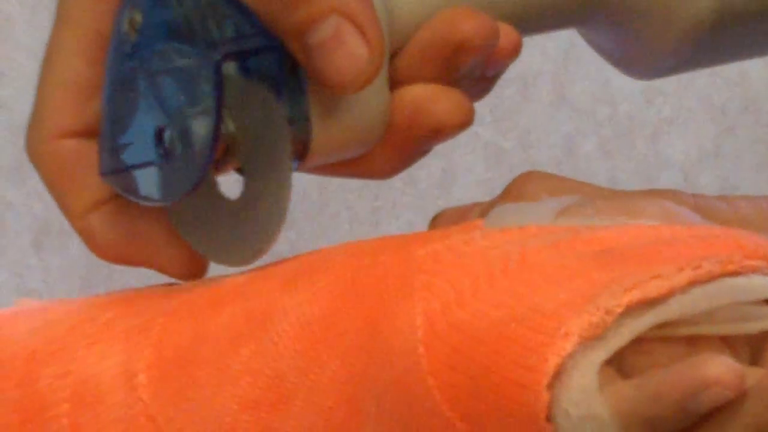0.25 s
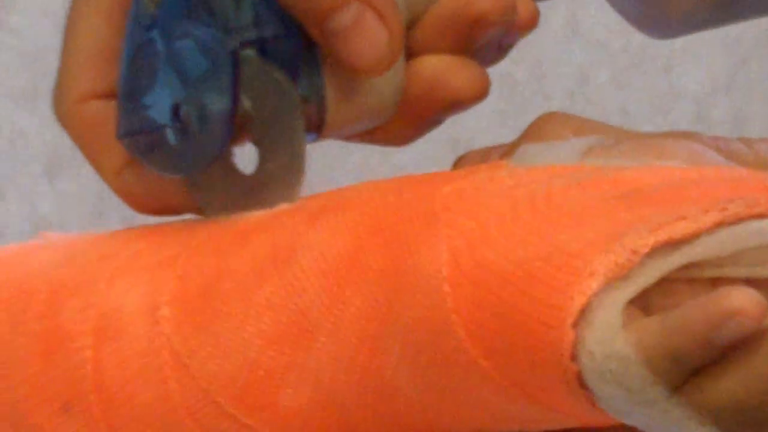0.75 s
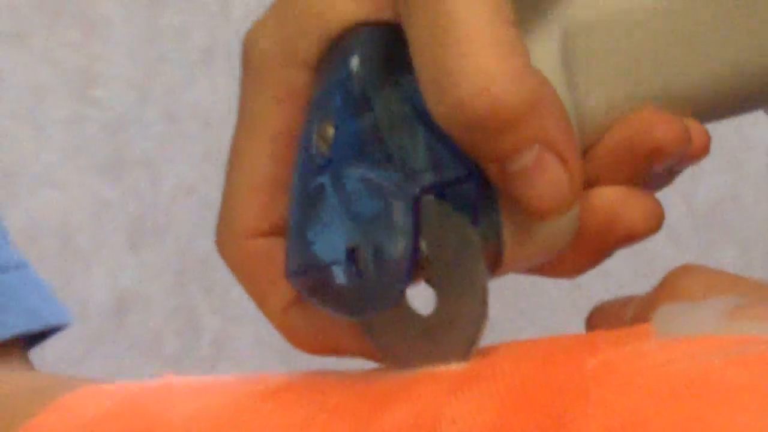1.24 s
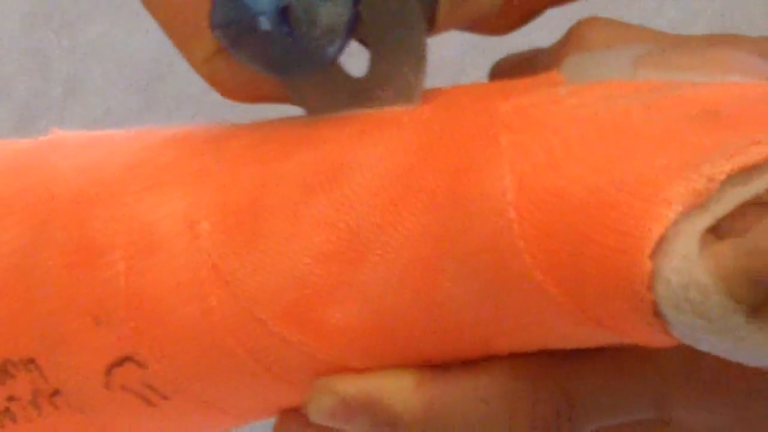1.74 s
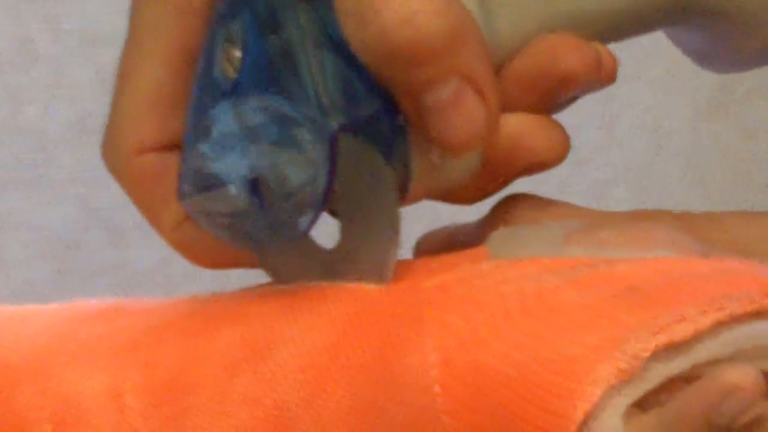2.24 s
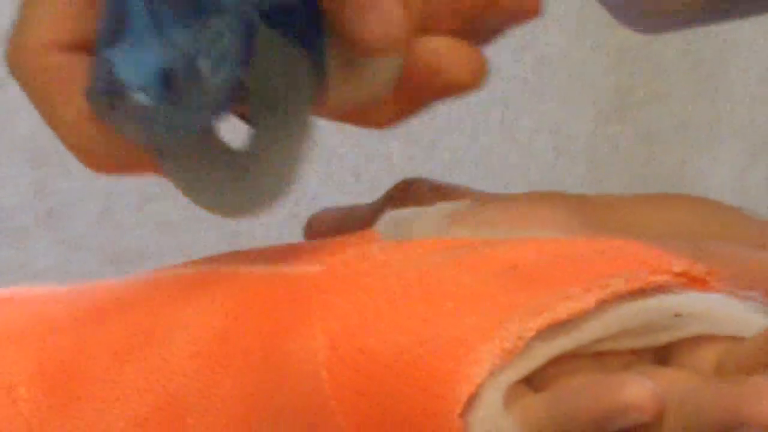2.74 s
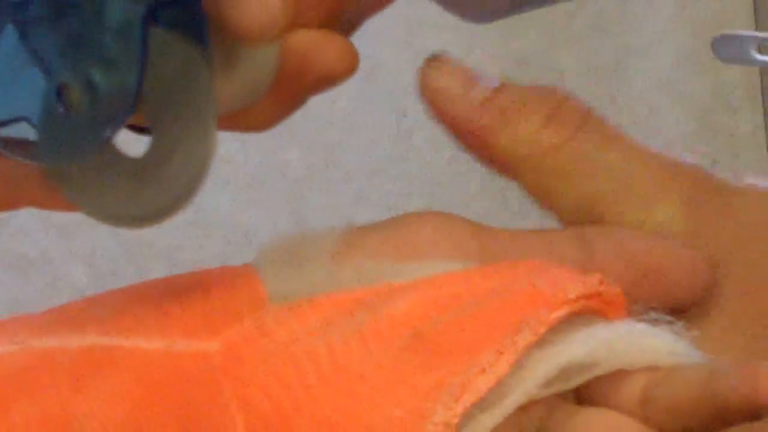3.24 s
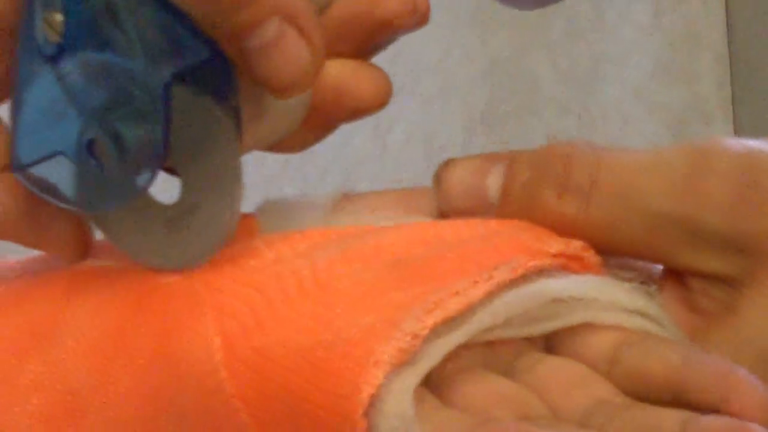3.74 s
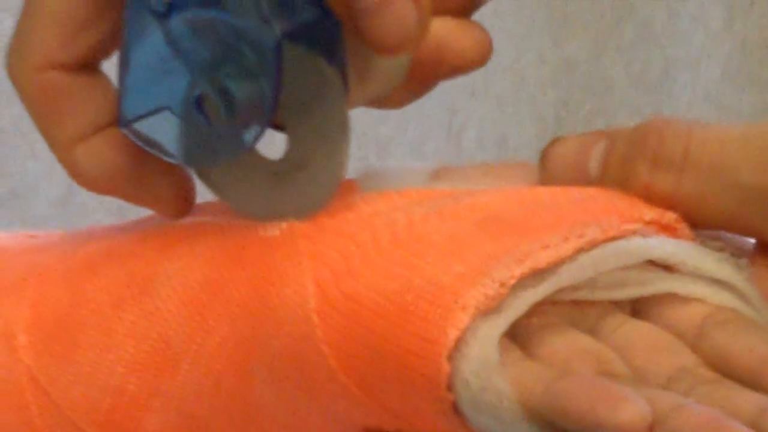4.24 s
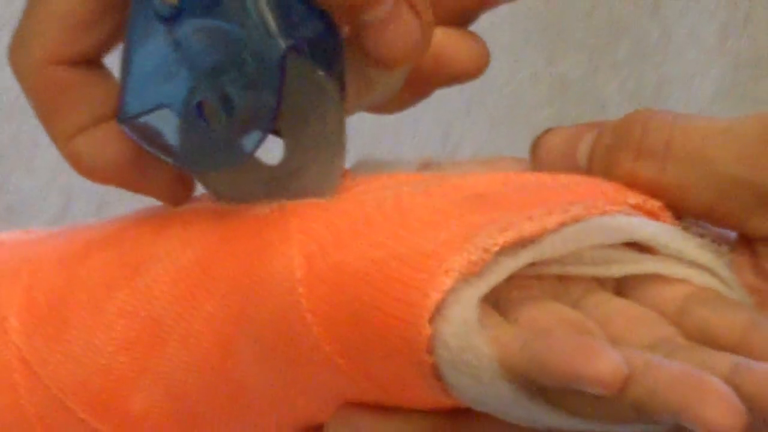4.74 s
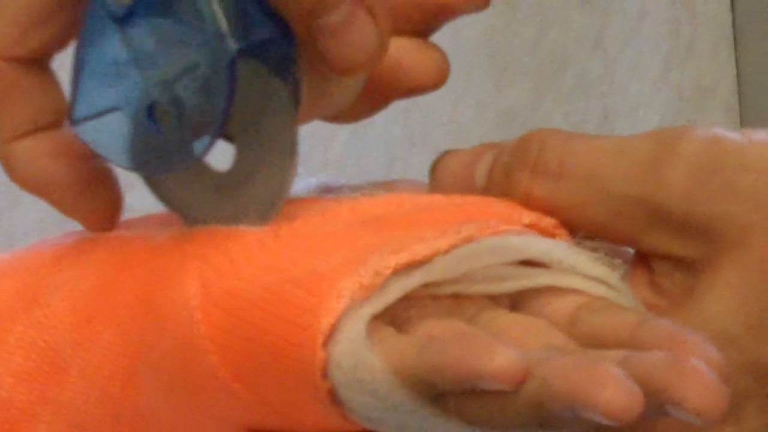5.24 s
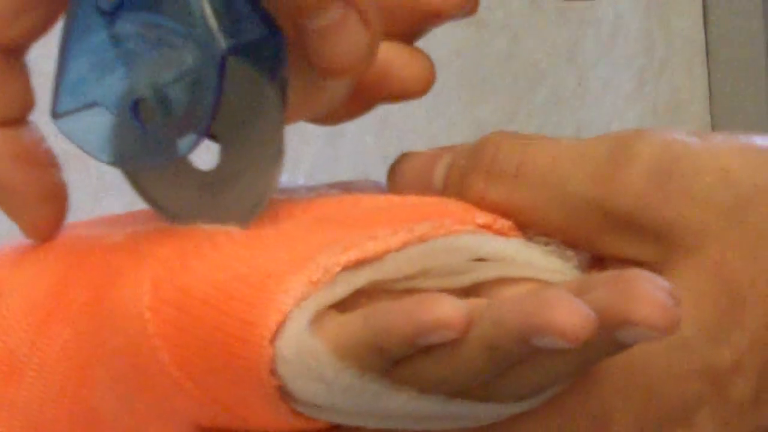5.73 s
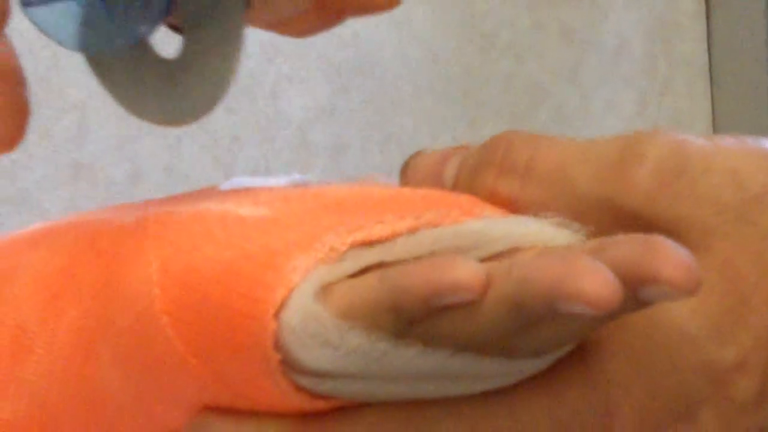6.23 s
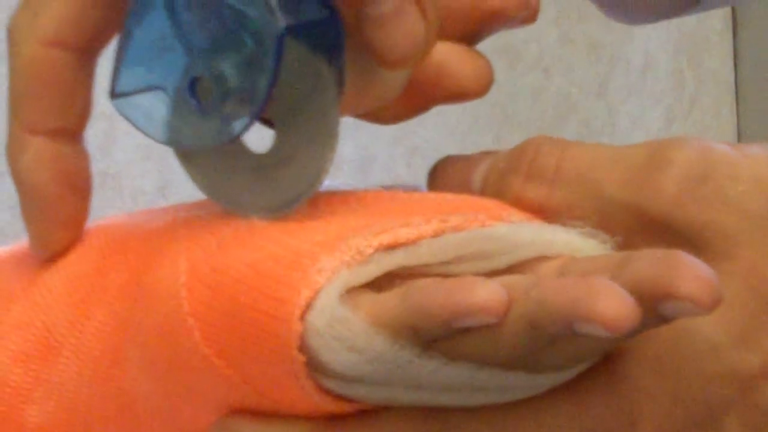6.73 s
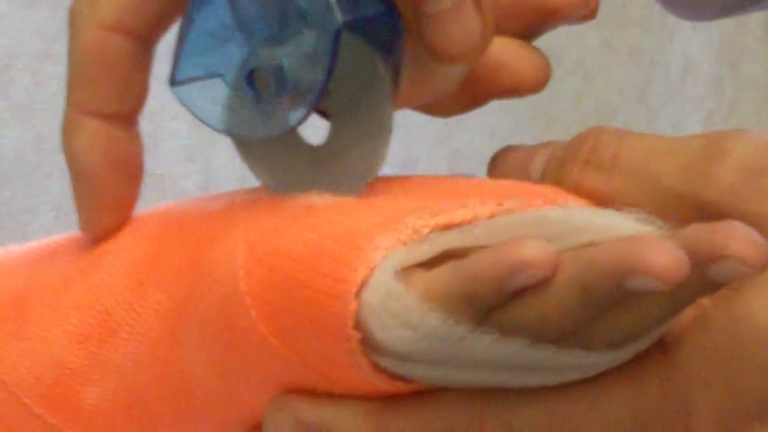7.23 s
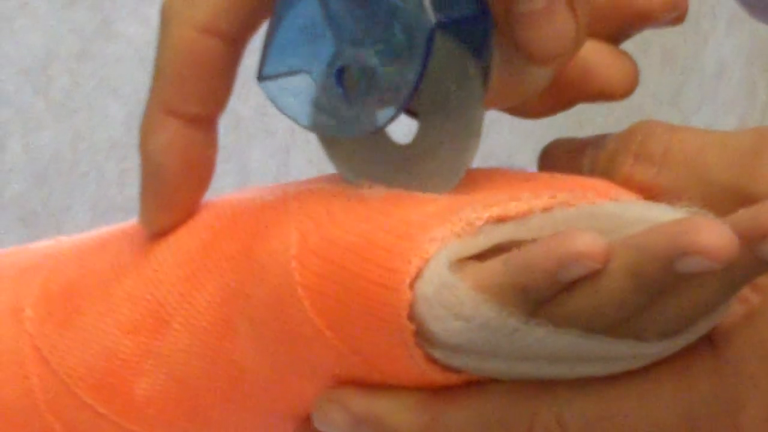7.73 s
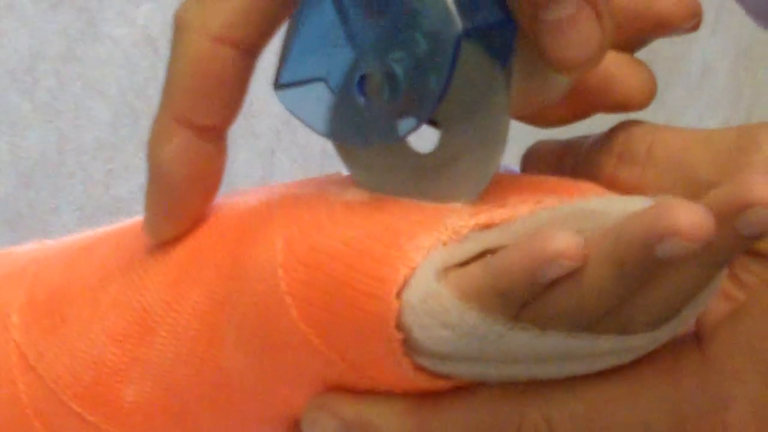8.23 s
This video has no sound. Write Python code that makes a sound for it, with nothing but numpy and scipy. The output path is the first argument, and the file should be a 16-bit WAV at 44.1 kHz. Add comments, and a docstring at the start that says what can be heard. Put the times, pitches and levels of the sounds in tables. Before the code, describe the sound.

A small electric cast saw whines close by, sagging and turning raspy three times as its blade bites into a hard fiberglass cast.

```python
"""Treatment room: a small electric cast saw runs close by, pressed three times into a fiberglass cast.
The oscillating blade whines as a stack of swing overtones; the drive adds high overtones and pulsed hiss.
Random clicks scrape throughout; in each cut the motor sags, the whine roughens and the teeth rasp.
Snags ring the shell. A second motor hums steadily over coloured air noise and faint rumble."""
import sys
import numpy as np
from scipy import signal
from scipy.fft import rfft, irfft, next_fast_len
from scipy.io import wavfile
from scipy.ndimage import uniform_filter1d

SR = 44100
rng = np.random.default_rng(int(sys.argv[2]) if len(sys.argv) > 2 else 0)


def persist_wave(psi):
    """Save psi, clipped to +-1, as 16-bit WAV."""
    counts = np.round(np.clip(psi, -1, 1) * 32767).astype(np.int16)
    wavfile.write(sys.argv[1], SR, np.atleast_2d(counts).T)


N = 373729


def from_db(db):
    """Decibels to gain."""
    return 10 ** (np.asarray(db) / 20)


def rms_one(x):
    """Scale to unit rms."""
    return x / np.sqrt(np.mean(x ** 2) + 1e-20)


def in_time(rows):
    """Each column of a time curve, at every sample."""
    time_s, *columns = np.transpose(rows)
    return [np.interp(np.arange(N) / SR, time_s, column) for column in columns]


def at_hz(points, hz):
    """Each column of a spectrum, read on a log-frequency axis."""
    grid_hz, *columns = np.transpose(points)
    return [np.interp(np.log(hz + 1), np.log(grid_hz), column) for column in columns]


def drift(rate_hz):
    """Slow noise, rms near 1: two-pole lowpass on every 40th sample, then interpolated."""
    pole = np.exp(-80 * np.pi * rate_hz / SR)
    noise = rng.standard_normal(N // 40 + 2002)
    slow = signal.lfilter([1], [1, -2 * pole, pole * pole], noise)[2000:]  # drop the warm-up
    return np.interp(np.arange(N) / 40, np.arange(len(slow)), rms_one(slow))


def colour(x, spectrum):
    """Give x a smooth spectrum; rms 1."""
    size = next_fast_len(N)
    level_db, = at_hz(spectrum, np.arange(size // 2 + 1) * SR / size)
    return rms_one(irfft(rfft(x, size) * from_db(level_db), size)[:N])


def swells(rows):
    """Half-cosine rise and fall in dB for each row of (middle_s, length_s, change_db)."""
    t, out = np.arange(N) / SR, np.zeros(N)
    for middle_s, length_s, change_db in rows:
        near = np.abs(t - middle_s) < length_s / 2
        out[near] += change_db * np.cos(np.pi * (t[near] - middle_s) / length_s)
    return out


# press of the blade into the cast: start_s, end_s, extra_scrape_db
PRESSES = [(.55, 2.87, 2), (4.42, 6.21, 2.7), (7.32, 8.7, 0.5)]
SINK_S, LIFT_S = 0.14, 0.14


def contact():
    """Blade hold in the cast, 0 (air) to 1 (cut), and the extra scrape of each cut in dB."""
    t, load, scrape_db = np.arange(N) / SR, 0, 0
    for start_s, end_s, extra_db in PRESSES:
        held = np.clip(np.minimum((t - start_s) / SINK_S, (end_s - t) / LIFT_S), 0, 1)
        load = load + held
        scrape_db = scrape_db + extra_db * held
    return load, scrape_db


# one overtone swelling for a moment, in the air or in the cut: middle_s, length_s, order, rise_db
SQUEALS = [(0.616, .12, 6, 6.5), (1.38, 0.15, 6, 12), (1.387, 0.14, 9, 9.5), (1.45, 1, 10, 7),
           (1.548, 0.13, 8, 8), (1.685, 0.15, 6, 7), (1.69, 0.18, 7, 8.5), (2.1, 0.78, 9, 6),
           (2.173, 0.38, 8, 5.5), (2.96, 0.6, 9, 5.5), (3.14, 0.31, 7, 4), (3.25, 0.8, 13, 6),
           (3.45, .4, 11, 5.5), (3.66, 1.1, 9, 4), (3.645, .9, 10, 2.5), (3.7, 0.99, 3, 4),
           (4.63, 0.22, 6, 6), (4.894, 0.15, 6, 7), (5.205, 0.14, 6, 8), (5.672, 0.16, 6, 4.5),
           (5.8, 1.1, 12, 6.5), (6.006, 0.27, 6, 5), (6.45, .3, 7, 3), (6.743, .2, 11, 5),
           (7.138, 0.36, 11, 8), (8.03, 1.3, 6, 5), (8.1, 0.18, 8, 0)]


def squeal(order):
    """Rise in dB of one overtone while it swells."""
    return swells([(middle_s, length_s, rise_db) for middle_s, length_s, swelling, rise_db in SQUEALS
                   if round(swelling) == order])


WHINE_DIP_DELAY_S, WHINE_DIP_S, WHINE_DIP_DB = 0.17, 0.12, -6


def whine_dip():
    """The swell of the whine dips shortly after each press starts and around its end, in dB."""
    moments_s = [s for start_s, end_s, _ in PRESSES for s in (start_s + WHINE_DIP_DELAY_S, end_s)]
    return swells([(s, WHINE_DIP_S, WHINE_DIP_DB) for s in moments_s])


def overtone(order, phase, load, waver_db, free_rough, cut_rough):
    """One multiple of the swing, rms near 1; roughness smears it into a band, as teeth catch in the cut."""
    rough = free_rough + (cut_rough - free_rough) * load
    angle = order * phase + rng.uniform(0, 2 * np.pi) + rough * drift(14.0)
    flicker = from_db(waver_db * drift(7.0)) * (1 + rough * drift(17.3)) / np.sqrt(1 + rough ** 2)
    return np.sqrt(2) * np.sin(angle) * flicker


# swell of the whine, before shares: time_s, swell_db
WHINE_SWELL = [(0, 9.5), (.16, 9.5), (.64, 8.5), (.73, -2), (1.4, 0), (1.9, -7), (2.25, -12), (2.5, -6.5),
               (2.8, -3), (3.05, 3.5), (3.4, 3.5), (3.9, -3.5), (4.46, 5.5), (4.57, -1), (5.3, 2.5),
               (7.35, 0), (7.58, -6.5), (8.1, -0.5)]
# leading overtones, before swell, squeal and trim: order, free_db, cut_db, swell_share
WHINE = [(2, -61, -52, 0.39), (5, -40, -41, 0.87), (6, -48, -39, 0.18), (7, -42.5, -44.5, .55),
         (8, -51.5, -42.5, 0), (9, -42, -41, 0.56), (11, -47.5, -48, 0.04)]
# other low overtones, before squeal and trim: order, free_db, cut_db
BUZZ = [(3, -52, -55), (4, -75, -54), (10, -52, -48), (12, -55, -52.5), (13, -51, -58)]
SWING_DB, SWING_LOAD_DB, SWING_DB_PER_HZ_PER_S, SWING_WAVER_DB = -51, 4, 0.0446, 1.34


def blade_whine(phase, load, braking_hz_per_s, lead_trim_db=-0.3, buzz_trim_db=-1.5,
                free_waver_db=0.87, cut_waver_db=1.5):
    """Swinging blade and housing radiate a clean fundamental and overtones that roughen in the cut."""
    swing_db = SWING_DB + SWING_LOAD_DB * load + SWING_WAVER_DB * drift(7.3)
    swing_db = swing_db + SWING_DB_PER_HZ_PER_S * np.maximum(braking_hz_per_s, 0)
    out = np.sqrt(2) * from_db(swing_db) * np.sin(phase)
    swell_db = in_time(WHINE_SWELL)[0] + whine_dip()
    waver_db = free_waver_db + (cut_waver_db - free_waver_db) * load
    for order, free_db, cut_db, swell_share in WHINE:
        order = round(order)
        level_db = free_db + (cut_db - free_db) * load + swell_share * swell_db
        level_db = level_db + squeal(order) + lead_trim_db
        out += from_db(level_db) * overtone(order, phase, load, waver_db,
                                            free_rough=0.013 * order, cut_rough=0.0042 * order ** 2)
    for order, free_db, cut_db in BUZZ:
        order = round(order)
        level_db = free_db + (cut_db - free_db) * load + squeal(order) + buzz_trim_db
        out += from_db(level_db) * overtone(order, phase, load, waver_db=0.61 * np.sqrt(order),
                                            free_rough=0.035 * order, cut_rough=0.047 * order)
    return out


# knock overtone levels, before trim and treble: pitch_hz, free_db, cut_db
KNOCK = [(3370, -53, -50.5), (3940, -61.5, -62), (4220, -51.5, -52), (4970, -62.5, -60.5),
         (6030, -52.5, -58.5), (6460, -50.5, -53.5), (7100, -60.5, -59.5), (8700, -77, -70.5),
         (10000, -70, -73), (12500, -87, -77.5), (15000, -98, -100)]
KNOCK_ORDERS = range(14, 52)
DRAG_BELOW_HZ = 254.9  # swings per s below which drag counts; also places the knock overtones


def drive_knock(phase, load, trim_db=0.5, waver_db=2.5):
    """Play in the drive sounds as high swing overtones; contact shifts their levels and smears them."""
    out = np.zeros(N)
    for order in KNOCK_ORDERS:
        free_db, cut_db = at_hz(KNOCK, order * DRAG_BELOW_HZ)
        angle = order * phase + rng.uniform(0, 2 * np.pi) + (0.12 + 0.5 * load) * drift(9.4)
        level_db = free_db + (cut_db - free_db) * load + waver_db * drift(3.9) + trim_db
        out += np.sqrt(2) * from_db(level_db) * np.sin(angle)
    return out


def strokes(phase, depth_db, back_db):
    """Gain with two strokes a swing, made unequal by back_db; rms 1."""
    return rms_one(from_db(depth_db * np.cos(2 * phase) + back_db * np.cos(phase)))


# drive hiss colour: pitch_hz, level_db
RATTLE = [(500, -15), (1200, 2.5), (2200, 0.5), (2700, 0.5), (3400, -1), (4300, 3.5), (5100, -2.5),
          (6500, 4.5), (7300, -4), (8700, -11.5), (10400, -13.5), (11500, -20), (13700, -24.5),
          (15000, -45)]


def drive_rattle(phase, treble_db, above_treble_db=4.5, flutter_db=1.5):
    """Bright mechanical hiss, pulsing with the strokes."""
    hiss = rng.standard_normal(N) * strokes(phase, depth_db=3.0, back_db=3.5)
    hiss = hiss * from_db(0.53 * drift(250))
    return from_db(treble_db + above_treble_db + flutter_db * drift(20)) * colour(hiss, RATTLE)


# scraping noise rises (+) or dips (-): middle_s, length_s, scrape_db
SCRAPE_SWELLS = [(.72, 0.28, 1.5), (.91, 0.12, 2), (1.21, 0.09, 0), (1.52, 0.31, 2), (1.98, .12, -2),
                 (2.2, 0.079, 2), (2.38, 0.33, -4.5), (2.66, 0.12, 0.5), (2.78, .08, 0.5), (4.85, .16, -2),
                 (5.8, 0.31, -4.5), (6.94, 0.12, -5), (7.55, 0.29, -2.5), (7.7, 0.084, 4.5),
                 (8.43, 0.066, 2)]
# rasp colour: pitch_hz, level_db
RASP = [(150, -35), (450, -15), (620, -18), (740, -3.5), (850, -11), (1100, -5), (1400, -1), (1750, -1.5),
        (2100, 1), (2600, -8), (3900, -5), (6500, -21), (9000, -27), (15000, -52)]
SCRAPE_DB, SCRAPE_LOAD_DB, SCRAPE_DB_PER_HZ, SCRAPE_WAVER_DB = -42.3, 0.45, 0.3137, 0.76


def tooth_rasp(phase, load, cut_db, drag_hz, clicks_per_s=6000, size_db=1.5, catch_db=1.05,
               chatter_db=0.04):
    """Random clicks rustle throughout, louder with drag, uneven in the cut as teeth snap glass fibres."""
    scrape_db = SCRAPE_DB + SCRAPE_LOAD_DB * load + SCRAPE_DB_PER_HZ * drag_hz + cut_db
    scrape_db = scrape_db + swells(SCRAPE_SWELLS) + SCRAPE_WAVER_DB * drift(2.6)
    clicks = (rng.random(N) < clicks_per_s / SR) * rng.choice([-1, 1], N)
    clicks = clicks * from_db(size_db * np.minimum(rng.exponential(1, N), 4))
    clicks *= strokes(phase, depth_db=-1.4, back_db=1.0)
    clicks *= from_db(load * (catch_db * drift(85) + chatter_db * drift(34)))
    return from_db(scrape_db) * colour(clicks, RASP)


# steady motor lines: pitch_hz, level_db
HUM = [(312.8, -62.5), (704, -64), (938.6, -53.5), (1877, -62), (2192, -60)]
# air colour: pitch_hz, level_db
ROOM = [(20, -20), (32, -23), (45, -14), (70, -1), (120, -14.5), (200, -8.5), (310, 0), (430, -11.5),
        (580, -5.5), (700, -0.5), (850, -1.5), (1500, -10), (4000, -31)]


def room_tone(air_db=-53.0, rumble_db=-59.0):
    """Steady motor lines and coloured air, plus faint rumble differing a little between channels."""
    t, hum = np.arange(N) / SR, 0
    for pitch_hz, level_db in HUM:
        gain = np.sqrt(2) * from_db(level_db + 1.1 * drift(3.6))
        hum = hum + gain * np.sin(2 * np.pi * pitch_hz * t + 0.81 * drift(6.8))
    air = from_db(air_db + 1.3 * drift(3.4)) * colour(rng.standard_normal(N), ROOM)
    rumble_band = signal.butter(3, [12, 28], "band", fs=SR, output="sos")
    mid, side = rms_one(signal.sosfilt(rumble_band, rng.standard_normal((2, N))))
    return hum + air + from_db(rumble_db) * (mid + side * np.array([[0.5], [-0.5]]))


# teeth snag on a thick fibre bundle, before mode level and trim: start_s, peak_db
SNAGS = [(1.449, -21), (1.468, -19), (1.48, -23), (1.485, -24), (1.488, -35), (1.492, -21), (1.501, -30),
         (1.529, -26), (1.745, -23)]
# cast shell modes: pitch_hz, level_db, t60_s
SHELL = [(760, -21, 0.027), (954, -4, 0.073), (1180, -17, .02), (1410, 2.5, 0.03), (2070, -12, .008)]


def snags(trim_db=-6.0, low_hz=700, high_hz=2800):
    """A snag jerks the cast's shell, which rings briefly and is too small to radiate bass."""
    out, t = np.zeros(N), np.arange(SR // 20) / SR
    for start_s, peak_db in SNAGS:
        start = round(start_s * SR)
        for pitch_hz, mode_db, t60_s in SHELL:
            level_db = trim_db + peak_db + mode_db + rng.normal(0, 1.8) - 60 * t / t60_s
            gain = rng.choice([-1, 1]) * from_db(level_db)
            out[start:start + len(t)] += gain * np.sin(2 * np.pi * pitch_hz * t)
    shell_band = signal.butter(2, [low_hz, high_hz], "band", fs=SR, output="sos")
    return signal.sosfilt(shell_band, out)


# motor speed: time_s, swings_hz
SPEED = [(0.0, 258.9), (0.26, 257.8), (0.38, 259.5), (0.57, 258.3), (0.68, 254.4), (0.73, 249.0),
         (0.85, 243.7), (1.18, 243.3), (1.39, 239.4), (1.53, 233.2), (1.65, 239.8), (2.1, 246.4),
         (2.22, 243.9), (2.57, 247.6), (2.76, 243.7), (2.99, 255.0), (3.21, 258.2), (3.7, 260.0),
         (4.36, 258.7), (4.43, 256.7), (4.6, 248.3), (4.72, 248.0), (4.91, 243.4), (5.02, 245.6),
         (5.28, 246.1), (5.52, 244.8), (5.83, 248.2), (6.08, 246.4), (6.25, 253.9), (6.44, 257.3),
         (6.67, 259.0), (6.94, 255.7), (7.26, 257.0), (7.71, 247.9), (8.4, 246.5), (8.47, 245.2)]
# treble level that hiss and knock follow: time_s, level_db
TREBLE = [(0.0, -45.5), (0.23, -45), (1.25, -47.5), (1.3, -57), (1.7, -45), (2.83, -47), (2.88, -45.5),
          (3.35, -48.5), (3.51, -44), (5.26, -46.5), (5.57, -43), (5.85, -45), (6.25, -46), (8.47, -46.5)]
INERTIA_S = 0.062  # lag of motor speed behind drag
KNOCK_TREBLE_SHARE, JUDDER_DB = 0.3, 0.75


def scene():
    """Motor speed sets the swing; contact roughens the whine; drag drives the scraping."""
    speed_hz, = in_time(SPEED)
    treble_db, = in_time(TREBLE)
    load, cut_db = contact()
    braking_hz_per_s = -uniform_filter1d(np.gradient(speed_hz) * SR, size=SR // 10)
    drag_hz = np.maximum(DRAG_BELOW_HZ - speed_hz + INERTIA_S * braking_hz_per_s, 0)
    jitter = (0.0005 + 0.00062 * load) * drift(21.9)
    phase = 2 * np.pi * np.cumsum(speed_hz * (1 + jitter)) / SR
    blade = blade_whine(phase, load, braking_hz_per_s) + tooth_rasp(phase, load, cut_db, drag_hz)
    blade = blade * from_db(JUDDER_DB * load * drift(20))
    knock = drive_knock(phase, load) * from_db(KNOCK_TREBLE_SHARE * (treble_db - treble_db.mean()))
    return blade + knock + drive_rattle(phase, treble_db) + snags() + room_tone()


NOTCH_HZ, NOTCH_WIDTH_HZ, CUTOFF_HZ = 5458, 1780, 15050


def record(dry):
    """The microphone has one deep treble notch; a steep lowpass cuts the top."""
    notch = signal.iirnotch(NOTCH_HZ, NOTCH_HZ / NOTCH_WIDTH_HZ, fs=SR)
    notched = signal.lfilter(*notch, dry)
    return signal.sosfilt(signal.ellip(12, 0.1, 80, CUTOFF_HZ, fs=SR, output="sos"), notched)


dry = scene()
out = record(dry)
persist_wave(out)
```